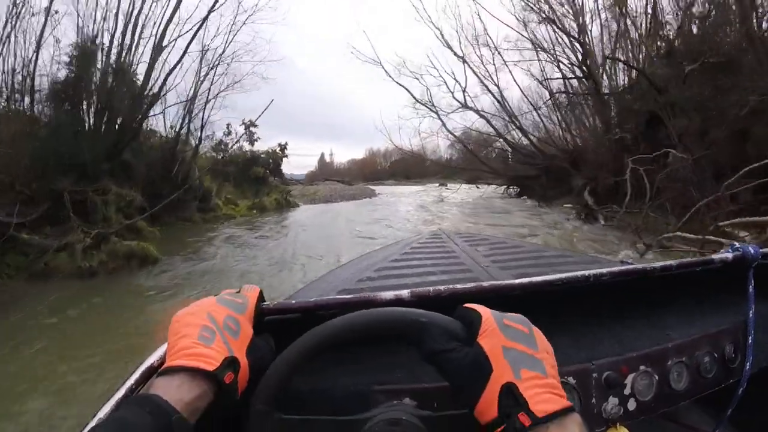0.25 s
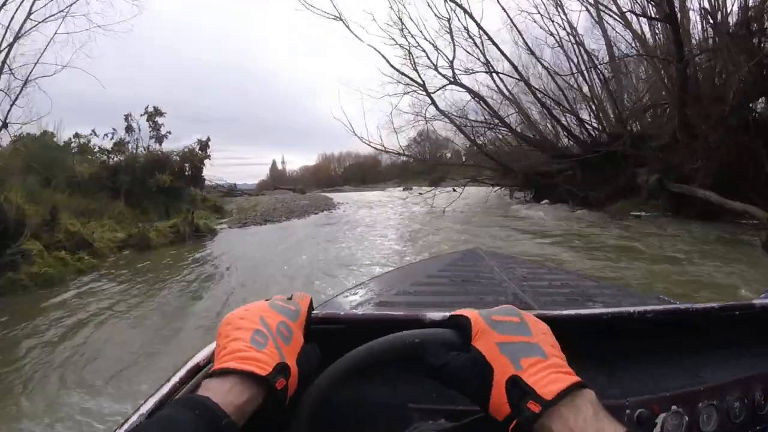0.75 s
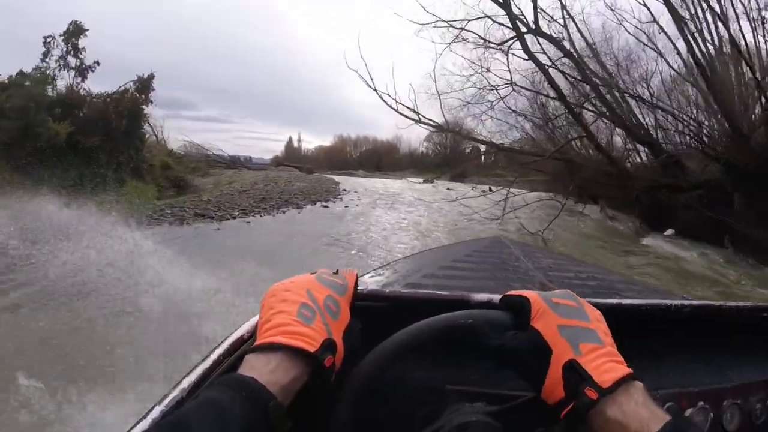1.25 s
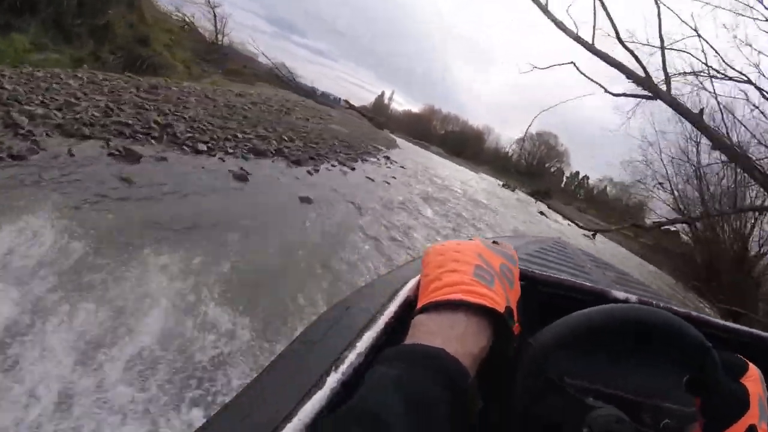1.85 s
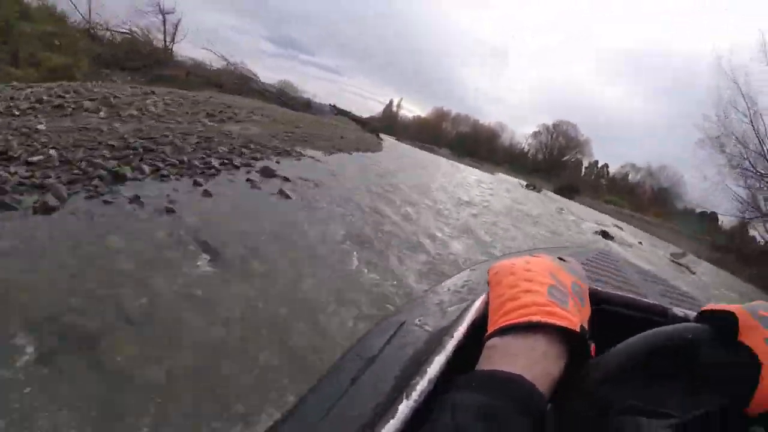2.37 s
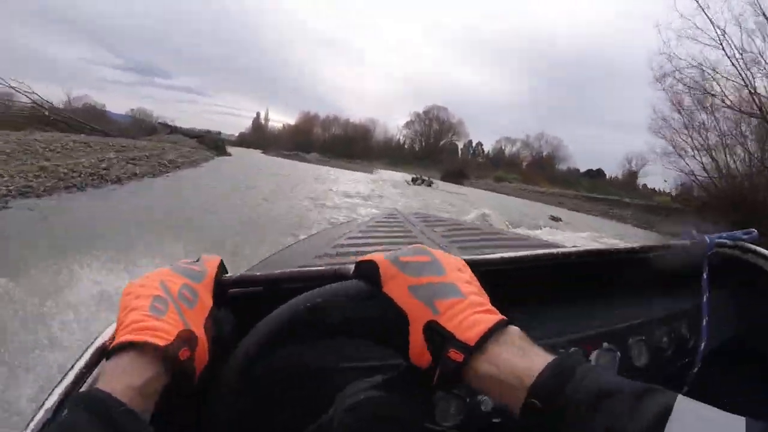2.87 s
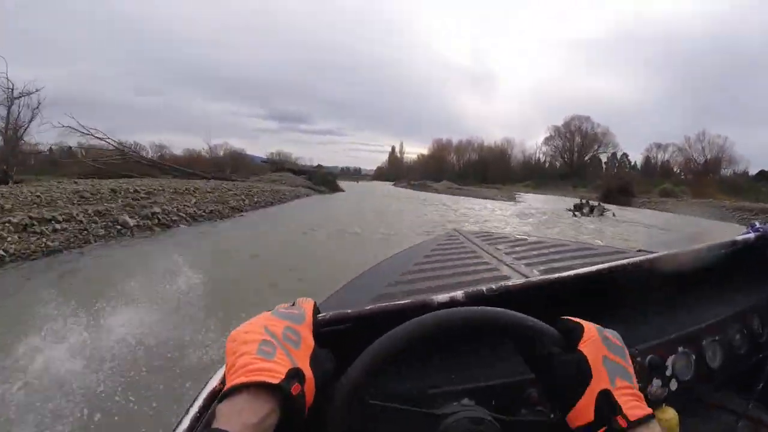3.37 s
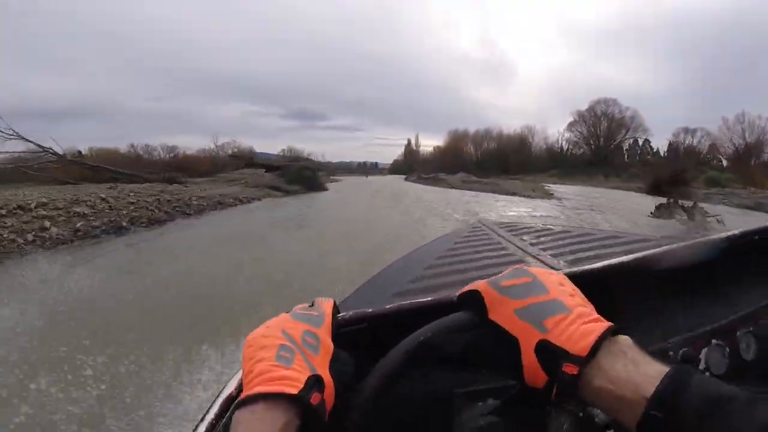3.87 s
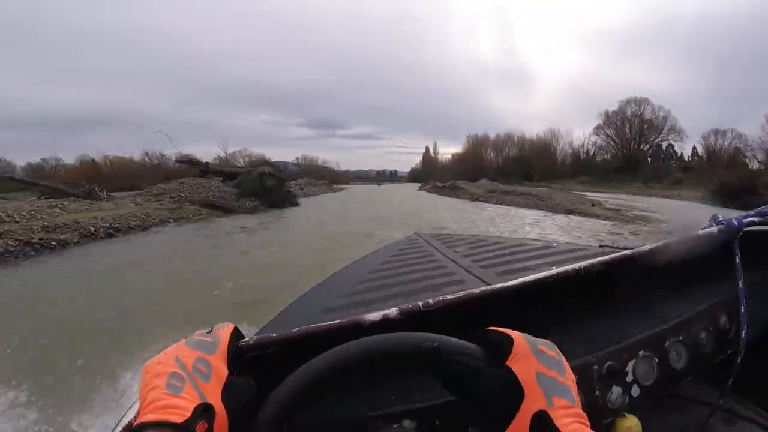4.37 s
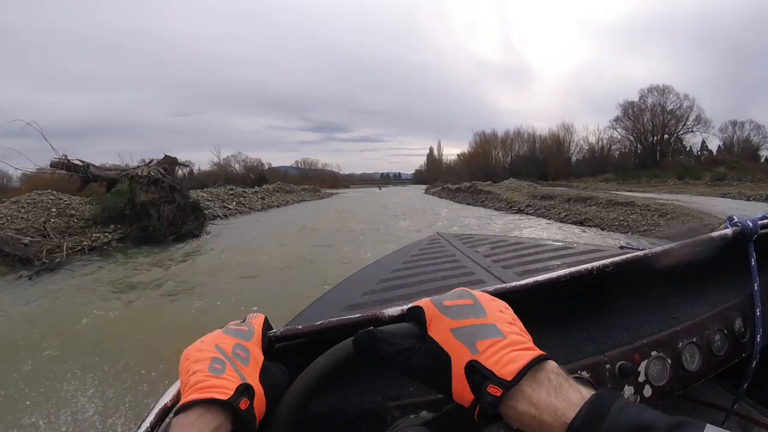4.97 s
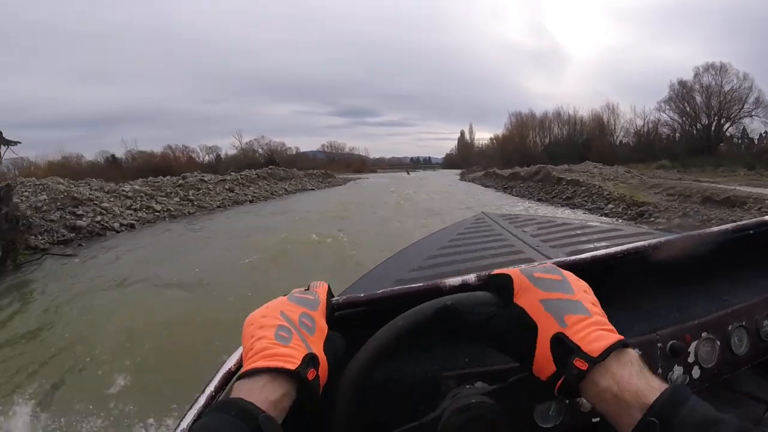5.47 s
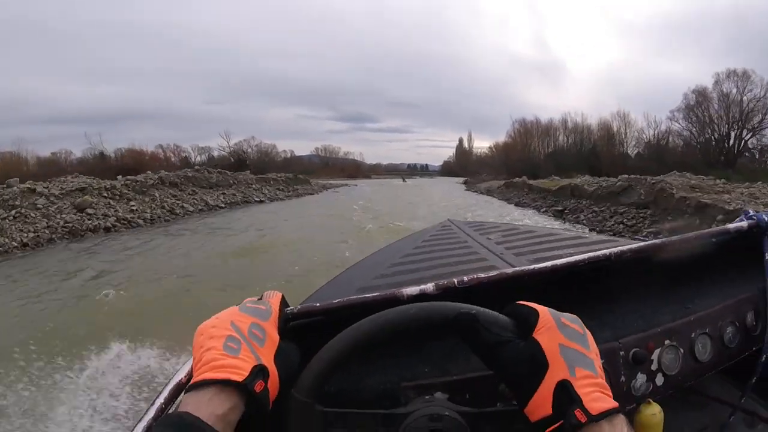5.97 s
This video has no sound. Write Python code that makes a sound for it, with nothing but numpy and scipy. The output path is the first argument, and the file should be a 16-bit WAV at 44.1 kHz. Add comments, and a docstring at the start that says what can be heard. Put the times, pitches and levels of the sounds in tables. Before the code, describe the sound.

A jet boat's V8 drones hard at high revs over rushing, hissing water, with one clank and boom as the hull hits gravel mid-turn.

```python
"""The exhaust of a V8 jet boat drones at about 4200 rpm up a shallow river, close, from a cased camera behind
the wheel. Its orders are tones locked to the crank; the engine clatters and whines and the jet pump howls.
Water rushes and churns along the metal hull and spray hisses, all as shaped noise; eddies thump the microphone.
In a hard turn the hull skips clear, strikes the gravel bed with a clank and a boom of decaying plate tones,
and slaps back into the water in short noise bursts."""
import sys
import numpy as np
from scipy.fft import rfft, irfft, next_fast_len
from scipy.io import wavfile
from scipy.ndimage import map_coordinates

SR = 44100
rng = np.random.default_rng(int(sys.argv[2]) if len(sys.argv) > 2 else 0)


def output_pcm(signal):
    """Save a mono or channel-first signal as 16-bit PCM at the path in sys.argv[1].

    Samples are clipped to [-1, 1] before scaling.
    """
    pcm = np.clip(np.atleast_2d(signal).T, -1, 1) * 32767
    wavfile.write(sys.argv[1], SR, np.round(pcm).astype(np.int16))


N = 274743

# crank speed, sagging in the turn and climbing on the straight: (time [s], speed [turns/s])
CRANK_SPEED = [(0, 70), (0.4, 70.6), (0.7, 69.85), (1, 70.46), (1.4, 70.5), (2, 69.4), (2.6, 69.6),
               (3.1, 70.7), (3.4, 70.6), (3.7, 70.6), (4.2, 71.14), (4.6, 70.1), (5.5, 70.8), (5.85, 70.76),
               (6.23, 70)]
# the hard turn: (time [s], heel of the hull [0-1])
HEEL = [(1.35, 0.05), (1.8, 0.85), (2.45, 1), (2.75, 0.09)]
# unevenly spaced exhaust puffs of one engine cycle: (place in the cycle [crank turns], level [dB])
EXHAUST_PUFFS = [(0, 0), (.46, -4), (1.02, 0), (1.47, -5)]
# colour of the spray, with the ring of the camera case: (frequency [Hz], relative level [dB])
SPRAY_COLOUR = [(1500, -19), (4000, -31), (4800, -24), (5500, -16.5), (6050, -13), (6510, 0), (6800, -7),
                (7100, -16.5), (7500, -27.5), (7850, -40.5), (8400, -28.5), (9300, -28), (10000, -41.5),
                (11500, -53)]


def amp(db):
    """Amplitude factor of a level in dB."""
    return 10 ** (np.asarray(db) / 20)


def unit(x):
    """x scaled to rms 1."""
    return x / np.sqrt(np.mean(x ** 2) + 1e-20)


def clock():
    """The time of every sample in seconds."""
    return np.arange(N) / SR


def swell(centre_s, half_s):
    """A bell-shaped rise and fall, down to 1/e at half_s either side of its centre."""
    return np.exp(-((clock() - centre_s) / half_s) ** 2)


def along(points, hz):
    """(Hz, value) points interpolated on a log frequency axis."""
    f, v = np.transpose(points)
    return np.interp(np.log(hz + 1), np.log(f + 1), v)


def curves(rows):
    """One value per sample for each column after the time."""
    s, *cols = np.transpose(rows)
    return [np.interp(clock(), s, c) for c in cols]


def wobble(rate):
    """A smooth random curve with rate knots a second."""
    coarse = clock()[::64]
    knots = rng.standard_normal(1024)
    return np.interp(clock(), coarse, map_coordinates(knots, [coarse * rate], mode="wrap"))


def filtered(x, response):
    """x times a response of frequency, padded so that its tail does not wrap round."""
    m = next_fast_len(N + SR // 2)
    return irfft(rfft(x, m) * response(np.fft.rfftfreq(m, 1 / SR)), m)[:N]


def colour(x, spectrum):
    """x shaped by a spectrum that falls away above its last point, at rms 1."""
    last_hz = spectrum[-1][0]
    return unit(filtered(x, lambda hz: amp(along(spectrum, hz)) / np.maximum(hz / last_hz, 1) ** 2))


def noise(spectrum):
    """Coloured noise of rms 1."""
    return colour(rng.standard_normal(N), spectrum)


def partial(angle, rough, rate):
    """A tone of the engine or drive whose strength and timing waver."""
    return np.sqrt(2) * (1 + rough * wobble(rate)) * np.cos(angle + rough * wobble(rate))


def pipe_phase(hz):
    """The exhaust pipe lets the bass out a little late, which rounds each puff (radians)."""
    spread = 3  # radians for each e-fold in pitch
    centre_hz = 300
    return -spread * np.log((hz + 1) / centre_hz)


def lead(orders):
    """The angle at which each order leaves the pipe, in step with the puffs (radians)."""
    turns, db = np.transpose(EXHAUST_PUFFS)
    speed = np.mean(CRANK_SPEED, axis=0)[1]
    puff_sum = np.exp(-2j * np.pi * np.multiply.outer(orders, turns)) @ amp(db)
    return np.angle(puff_sum) + pipe_phase(orders * speed)


def cycle(crank, orders, db, smear):
    """The wave of two crank turns, its orders smeared in phase by so many radians."""
    size = 4096
    lines = np.zeros(size // 2 + 1, complex)
    phase = lead(orders) + smear * rng.standard_normal(len(orders))
    # two crank turns make one cycle, so half orders fall on whole lines
    lines[np.rint(2 * orders).astype(int)] = amp(db) * np.exp(1j * phase)
    wave = irfft(lines) * size / np.sqrt(2)
    return np.interp(crank / (4 * np.pi) % 1 * size, np.arange(size), wave)


def drifting(crank, orders, db, rate, drift, smear):
    """The direct pulse plus two diffuse reflections off banks and water that come and go."""
    echoes = sum(wobble(rate) * cycle(crank, orders, db, 2 * np.pi) for _ in range(2))
    return (cycle(crank, orders, db, smear) + drift * echoes) / np.sqrt(1 + 2 * drift ** 2)


def exhaust(crank, effort_db, load_db):
    """The drone: crank-locked orders pile up into two puffs a turn; heeling shifts their balance."""
    # drone, of which only the departure from its mean counts: (time [s], level [dB])
    drone = [(0, -29.5), (0.55, -29), (0.7, -23), (1.5, -26.5), (1.95, -20), (2.2, -26), (2.95, -24.5),
             (3.45, -32), (4.25, -24), (4.7, -29), (5.1, -27), (5.35, -23.5), (5.8, -23.5), (6.23, -28.5)]
    # orders that each follow effort, drone and heel: (multiple of crank speed, base level [dB],
    # rise with effort [dB/dB], rise with drone [dB/dB], change at full heel [dB])
    separate_orders = [(2, -28.4, 1.5, 0, -3), (4, -26.5, 0.83, 0.95, -1), (5, -34.5, 2.3, -0.8, -3),
                       (7, -30, 2.1, 1.37, -23), (9, -37, 0.65, .5, 0), (11, -40.5, 0.1, 0, -3.5),
                       (12, -42, 3.5, 0, -3.5), (14, -45.5, 1, 0, 1.5), (15, -46.5, 3, 0, -8)]
    # orders that rise and fall together, the half ones from unequal cylinders:
    # (multiple of crank speed, base level [dB])
    joint_orders = [(1, -34), (1.5, -42), (3, -38.5), (3.5, -33), (6, -44.5), (6.5, -43.5), (8, -42.5),
                    (9.5, -49.5), (10.5, -47.5), (12.5, -51), (13, -51.5), (13.5, -53), (17, -52),
                    (18, -54.5), (21, -54.5), (23, -51.5)]
    drone_db, = curves(drone)
    heel, = curves(HEEL)
    drone_swell_db = drone_db - np.mean(drone_db)
    separate = np.zeros(N)
    for order, db, per_effort, per_drone, heel_db in separate_orders:
        level_db = db + per_effort * effort_db + per_drone * drone_swell_db + heel_db * heel
        level_db = level_db + 1.16 * wobble(3.47)
        separate += amp(level_db) * partial(order * crank + lead(order), rough=0.17, rate=22)
    orders, db = np.transpose(joint_orders)
    joint = drifting(crank, orders, db, rate=3.4, drift=0.47, smear=0.35)
    return separate + joint * amp(load_db + 1.2 * wobble(35))


def bark(crank, load_db):
    """No two firings burn alike: each puff gets a random extra kick through the pipe."""
    # colour of the kicks: (frequency [Hz], relative level [dB])
    bark_colour = [(70, -22), (130, 0), (300, 3.5), (520, 1), (750, -11), (1100, -17.5), (2200, -30)]
    bark_db = -33.5  # at zero load
    turns, db = np.transpose(EXHAUST_PUFFS)
    cycles = np.arange(int(crank[-1] / (4 * np.pi)))
    at = np.searchsorted(crank, 2 * np.pi * (2 * cycles[:, None] + turns))
    strength = amp(db) * rng.uniform(-0.84, 1, at.shape)
    kicks = np.bincount(at.ravel(), strength.ravel(), N)[:N]
    piped = filtered(kicks, lambda hz: 1j * np.exp(1j * pipe_phase(hz)))
    return amp(bark_db + load_db) * colour(piped, bark_colour)


def clatter(crank):
    """Valves and blow-by: high orders buzz, noise jumps at each firing, one cylinder rasps when level."""
    # reference for buzz and rattle, which sit below it: (time [s], level [dB])
    clatter_level = [(0, -30.5), (.19, -30), (.25, -35), (1.1, -36.5), (2.02, -34), (2.15, -39.5),
                     (2.5, -39), (3.1, -35.5), (4.3, -34), (5.7, -33), (5.95, -36), (6.23, -34)]
    # colours of the buzz and of the rattle: (frequency [Hz], relative level [dB])
    buzz_colour = [(1100, 3), (1500, 2.5), (1800, 0), (2200, -0.5), (2450, -11.5), (3300, -14.5)]
    rattle_colour = [(400, -34.5), (750, 8), (1000, 2.5), (1350, 1), (1750, -12.5), (2150, 0.5),
                     (2450, -22.5), (3300, -10), (4200, -16.5), (6000, -41.5)]
    loud_cylinder_turns, loud_cylinder_db = 1.15, 5  # its place in the cycle; its rise at zero heel
    firing_db = 1.5  # fall between firings, regained in a jump
    clatter_db, = curves(clatter_level)
    heel, = curves(HEEL)
    orders = np.arange(31, 96) / 2
    mean_speed = np.mean(np.diff(crank)) * SR / (2 * np.pi)
    half_db = -3 * (orders % 1 > 0)  # the half orders are weaker
    buzz_db = along(buzz_colour, orders * mean_speed) + half_db
    buzz = unit(drifting(crank, orders, buzz_db, rate=2.5, drift=0.61, smear=2.05))
    since_firing = crank * 2 / np.pi % 1  # four firings a turn
    # a narrow peak once every two turns
    loud_cylinder = np.cos((crank - 2 * np.pi * loud_cylinder_turns) / 4) ** 70
    surge = amp(loud_cylinder_db * (1 - heel) * loud_cylinder - firing_db * since_firing)
    rattle = filtered(surge * noise(rattle_colour), lambda hz: 1 / (1 + (hz / 6000) ** 4))
    return amp(clatter_db - 8.0) * buzz + amp(clatter_db - 6.0) * unit(rattle)


def whine(crank, load_db):
    """A belt-driven accessory sings between the orders; other crank-locked tones swell and fade."""
    # tones of engine and drive: (time [s], half length [s], multiple of crank speed, level [dB])
    whine_swells = [(0.477, 0.02, 50.3, -49), (0.598, 0.37, 18, -49), (1.163, 0.18, 23, -42),
                    (1.4, 0.67, 6, -35), (1.47, 0.23, 48.2, -55), (3.096, 0.62, 23, -47),
                    (5.547, 0.45, 23, -46)]
    belt_ratio = 7.29  # multiple of crank speed
    out = amp(-36 + 2.1 * load_db) * partial(belt_ratio * crank, rough=0.17, rate=9)
    for s, half_s, ratio, db in whine_swells:
        level = amp(db + 1.7 * wobble(16)) * swell(s, half_s)
        out = out + level * partial(ratio * crank, rough=0.22, rate=20)
    return out


def pump(crank):
    """The jet pump's impeller howls at ten times the shaft speed as the turn loads it."""
    # the howl, strongest in the turn: (time [s], level [dB])
    howl_level = [(0, -36), (0.5, -46), (1, -33.5), (1.4, -32), (1.9, -28), (2.2, -33.5), (2.55, -30.5),
                  (3.3, -36), (4.2, -40), (5, -43), (5.6, -32.5), (6.23, -35.5)]
    howl_db, = curves(howl_level)
    return amp(howl_db) * partial(10 * crank, rough=0.14, rate=22)


def flow(effort_db):
    """Levels of wash and spray in dB: both follow engine effort and change with each sheet of spray."""
    # sheets thrown up by the hull: (time [s], half length [s], change of hiss [dB], change of wash [dB])
    spray_sheets = [(0.105, 0.12, 1, 1), (1.25, 0.37, 2.2, 0.5), (1.87, 0.27, 5, 1.5),
                    (2.95, 0.12, 1, -1.5), (3.62, 0.11, 1.4, 0.5), (4.39, 0.097, 1.5, 1.5),
                    (5.65, 0.17, 2, -1)]
    wash_db = -27.67 + 0.48 * effort_db
    spray_db = -31.5 + 0.69 * effort_db
    for s, half_s, hiss_db, churn_db in spray_sheets:
        sheet = swell(s, half_s)
        wash_db = wash_db + churn_db * sheet
        spray_db = spray_db + hiss_db * sheet
    return wash_db, spray_db


def water(crank, wash_db, spray_db):
    """Wash along the hull is shaken by the exhaust; droplets make the camera case ring near 6.5 kHz."""
    # colour of the wash: (frequency [Hz], relative level [dB])
    wash_colour = [(60, -25.5), (110, 0.5), (170, -0.5), (210, -4), (310, 0), (400, -1.5), (470, -5.5),
                   (550, -3), (630, -10.5), (800, -13), (1200, -34.5), (2500, -37.5)]
    burble_db = 0.54 * np.cos(2 * crank) + 2.1 * wobble(25)
    wash = unit(noise(wash_colour) * amp(burble_db)) * amp(wash_db)
    drops = rng.standard_normal(N) * (rng.random(N) < 1800 / SR)  # about 1800 a second
    spray = colour(rng.standard_normal(N) + 0.46 * unit(drops), SPRAY_COLOUR)
    flutter_db = 0.52 * wobble(30) + 0.17 * wobble(130)
    spray = unit(spray * amp(flutter_db)) * amp(spray_db)
    return wash + spray


def wind():
    """A lumpy rumble, and single ragged eddies that push and pull the diaphragm."""
    # wind, 2 dB under the rumble it makes: (time [s], level [dB])
    wind_level = [(0, -26), (.2, -28), (.65, -32), (2.35, -41.5), (2.75, -30.5), (3.3, -31), (3.7, -34),
                  (4.45, -28), (5.8, -27.5), (6.23, -31)]
    # colour of the rumble: (frequency [Hz], relative level [dB])
    buffet_colour = [(12, -18), (24, 0.5), (36, -3), (60, 1), (85, -4.5), (130, -21), (300, -39.5)]
    # eddies that hit the microphone: (time [s], level [dB], half length [s])
    eddy_thumps = [(0.274, -8, 0.013), (0.494, -14, 0.016), (0.86, -14, 0.011), (1.221, -10, 0.007),
                   (2.478, -16, 0.017), (2.811, -13, 0.01), (2.966, -13, 0.011), (3.207, -15.5, 0.016),
                   (4.352, -14, 0.014), (4.591, -8.5, 0.017), (5.023, -14, 0.012), (5.892, -9.5, 0.014)]
    swing_hz = 55.2  # swing of the diaphragm in an eddy
    wind_db, = curves(wind_level)
    out = amp(wind_db + 2.0) * unit(noise(buffet_colour) * amp(1.9 * wobble(14)))
    ragged = 0.26 * noise(buffet_colour)
    for s, db, half_s in eddy_thumps:
        swing = np.sin(2 * np.pi * swing_hz * (s - clock()))
        out = out + amp(db) * swell(s, half_s) * (swing + ragged)
    return out


def churn():
    """Water churns under the hull: each surge rings the hollow at its own pitch, as band-passed noise."""
    # surges: (time [s], half length [s], pitch [Hz], level [dB])
    hull_surges = [(0.134, 0.1, 510, -29.5), (1.499, 0.4, 410, -30), (2.848, 0.14, 487.2, -34),
                   (3.554, 0.51, 250, -34)]
    sharpness = 4.3  # of the hollow resonance
    out = np.zeros(N)
    for s, half_s, centre_hz, db in hull_surges:
        hollow = filtered(rng.standard_normal(N),
                          lambda hz: 1 / (1 + (sharpness * np.log((hz + 1) / centre_hz)) ** 2) ** 2)
        out += amp(db) * swell(s, half_s) * unit(hollow)
    return out


def blows():
    """Stone cracks on the metal almost at once; the slap and splash of water swell over milliseconds."""
    # blows on the hull: (time [s], stone crack after its first spike [dB], water slap [dB],
    # splash [dB], time to fall 60 dB [s])
    hull_blows = [(2.006, -38, -19, -21, 0.1), (2.088, -16.5, -26, -20.5, 0.096),
                  (2.104, -37, -18.5, -25, 0.14), (2.148, -50, -44, -13.5, 0.024),
                  (2.214, -42, -17, -35, 0.21), (2.223, -32, -23, -16, 0.038)]
    # colours of stone on metal and of water slapping the hull: (frequency [Hz], relative level [dB])
    stone_colour = [(90, -2), (250, 14), (800, 4), (1400, 0), (2000, -10), (2800, -12), (4500, -15.5),
                    (9000, -53)]
    slap_colour = [(60, -23), (140, -18), (330, 3), (600, -1), (1000, -27), (2500, -53)]
    t = clock()
    out = np.zeros(N)
    crack_rise_s, spike_s, wet_rise_s = 0.0003, 0.00051, 0.0026
    crack, slap, splash = noise(stone_colour), noise(slap_colour), noise(SPRAY_COLOUR)
    for s, crack_db, slap_db, splash_db, t60 in hull_blows:
        age = np.maximum(t - s, 0)
        attack = (1 - np.exp(-(age / crack_rise_s) ** 2)) * (1 + 1.2 * np.exp(-age / spike_s))
        hard = attack * amp(crack_db) * crack
        wet = (1 - np.exp(-age / wet_rise_s)) * (amp(slap_db) * slap + amp(splash_db) * splash)
        out += (t >= s) * amp(-60 * age / t60) * (hard + wet)
    return out


def skip():
    """The drop in dB of the water noise while the hull is clear of the water."""
    # hull out of the water: (from [s], to [s], change of the water noise [dB])
    hull_skips = [(2.035, 2.101, -6.5), (2.17, 2.214, -2)]
    edge_s = 0.004  # half the length of each ramp
    drop_db = np.zeros(N)
    for a, b, db in hull_skips:
        drop_db += db * np.interp(clock(), [a - edge_s, a + edge_s, b - edge_s, b + edge_s], [0, 1, 1, 0])
    return drop_db


def ring(blow, modes, rise_s):
    """Hull plates ring briefly under one blow as decaying sines, damped by the water."""
    s, blow_db = blow
    age = np.maximum(clock() - s, 0)
    tones = sum(amp(blow_db + db - 60 * age / t60) * np.sin(2 * np.pi * hz * age) for hz, db, t60 in modes)
    return tones * (1 - np.exp(-age / rise_s))


def boom():
    """A hard clank of the bottom plate on stone, then a soft boom as the boat's weight lands."""
    # the blow on the stone and the landing on the gravel: (time [s], level [dB])
    stone_strike = (2.0885, -17)
    gravel_landing = (2.1035, -5)
    # modes of the bottom plate and of the hull plates:
    # (frequency [Hz], level against the blow [dB], time to fall 60 dB [s])
    clank_modes = [(430, 0, 0.036), (815, -4, .09), (1115, -8.5, 0.11), (1338, -0.5, 0.069),
                   (1604, 0, 0.057), (2030, -6.5, 0.067), (2180, -8.5, 0.1), (2785, -10, 0.037)]
    plate_modes = [(100.6, -1, 0.1), (172, 0, 0.056), (300, -2, 0.04)]
    clank = ring(stone_strike, clank_modes, rise_s=0.00044)
    return clank + ring(gravel_landing, plate_modes, rise_s=0.0025)


def scene():
    """Engine, pump, water, hull and wind, all close to one microphone."""
    # engine effort, dropping sharply around the strike and then building again: (time [s], level [dB])
    effort = [(0, 0.5), (0.19, 1), (0.25, -2.5), (1, -1.9), (2.02, 0.8), (2.15, -5.5), (2.45, -4),
              (3, -0.63), (4.35, 1.93), (4.65, 1.25), (5.75, 0.74), (5.92, -0.2), (6.23, 0)]
    speed, = curves(CRANK_SPEED)
    effort_db, = curves(effort)
    skip_db = skip()
    crank = 2 * np.pi * np.cumsum(speed + 0.0788 * wobble(14)) / SR  # crank angle [radians]
    # speed and effort together lift the joint exhaust orders, the bark and the belt
    load_db = 0.77 * effort_db + 0.31 * (speed - np.mean(speed))
    engine = exhaust(crank, effort_db, load_db) + bark(crank, load_db)
    engine = engine + clatter(crank) + whine(crank, load_db)
    wash_db, spray_db = flow(effort_db)
    river = water(crank, wash_db, spray_db) + churn()
    # water noise falls away while the hull is in the air, and the engine follows 0.72 of the drop in dB
    running = engine * amp(0.72 * skip_db) + river * amp(skip_db)
    return (running + pump(crank) + wind() + blows() + boom())[None]


def record(dry):
    """The camera fades out the lowest bass and keeps nothing above its band limit."""
    low_hz, top_hz = 20, 11800
    return filtered(dry[0], lambda hz: (hz < top_hz) * (1 - np.exp(-(hz / low_hz) ** 2)))[None]


dry = scene()
out = record(dry)
output_pcm(out)
```